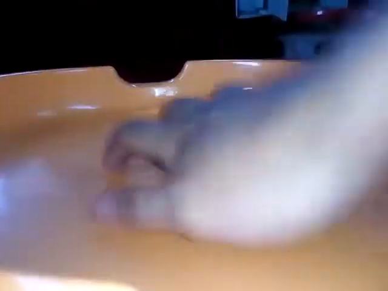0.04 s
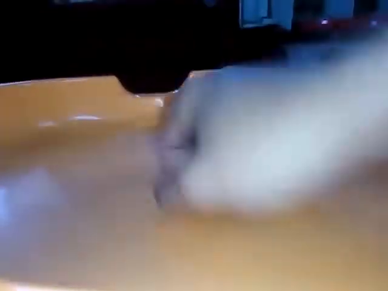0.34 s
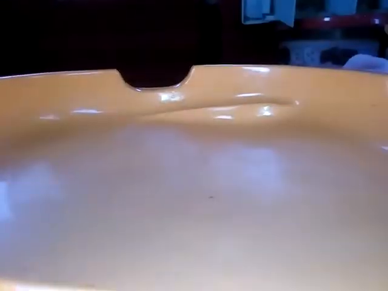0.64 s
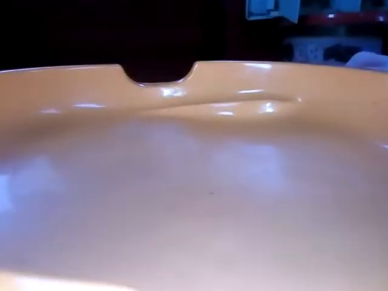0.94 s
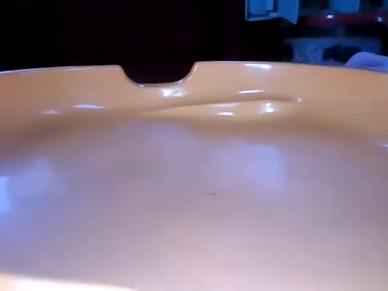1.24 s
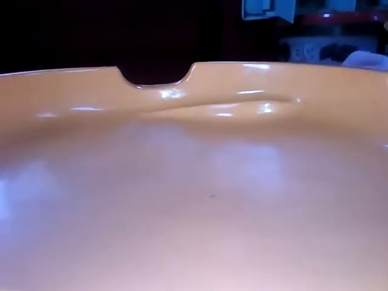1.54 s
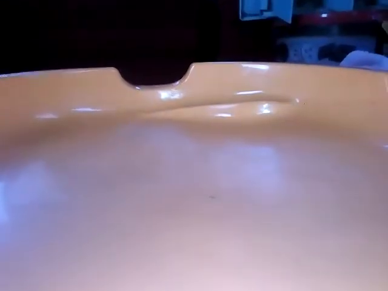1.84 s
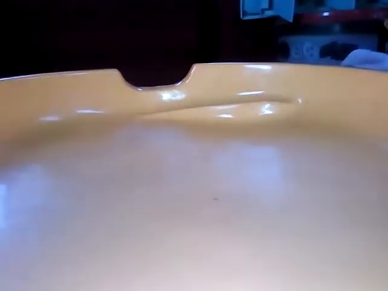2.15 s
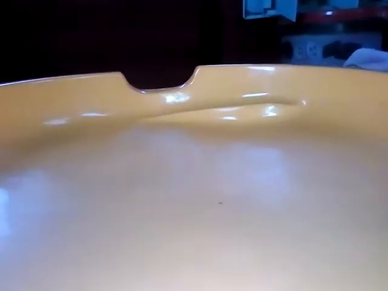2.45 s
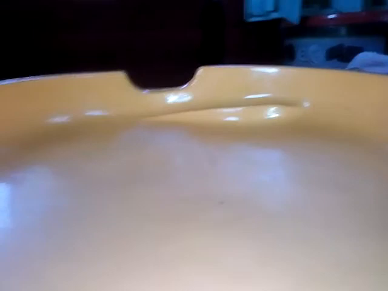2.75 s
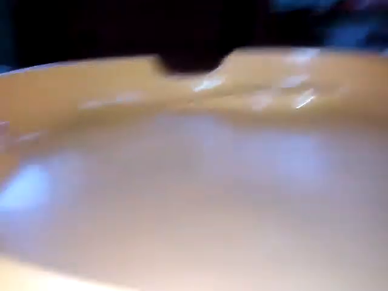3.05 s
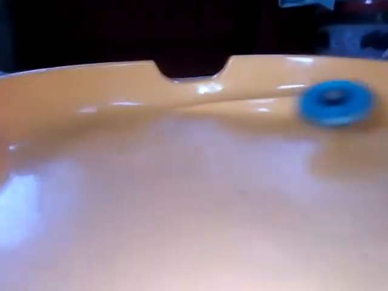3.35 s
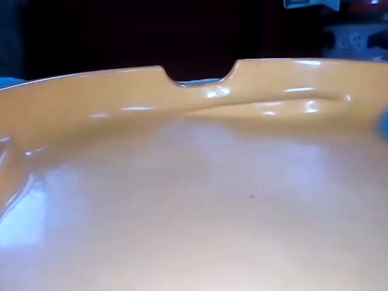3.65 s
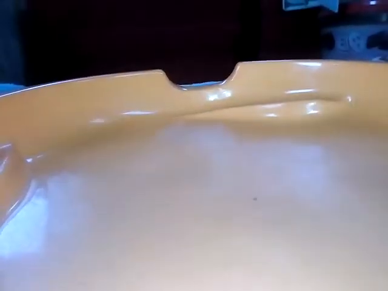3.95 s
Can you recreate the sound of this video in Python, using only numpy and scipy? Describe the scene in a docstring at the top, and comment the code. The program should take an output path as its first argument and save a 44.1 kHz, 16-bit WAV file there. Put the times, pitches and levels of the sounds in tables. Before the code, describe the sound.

Toy spinning top launched with plastic clicks and a quick zip, landing in a bowl, droning.

```python
"""You hear plastic brushing and clicking, a quick zip, a double clack, then a low, steady drone.
A hand sweeps a toy top out of a plastic bowl and clicks it onto its launcher. The zip is the toothed
cord turning the launcher's gear. The top drops into the bowl and spins, shaking it once per turn.
The hand-held camera thuds and rumbles throughout, over the hum and hiss of a small room."""
import sys
import numpy as np
from scipy import signal
from scipy.fft import rfft, irfft
from scipy.io import wavfile

SR = 44100
rng = np.random.default_rng(int(sys.argv[2]) if len(sys.argv) > 2 else 0)


def wrap_up_sound(samples):
    """Save the sound to the file named by the first command line argument, as 16-bit audio."""
    columns = np.atleast_2d(samples).T
    # keep every value between -1 and 1, then stretch to whole-number steps
    tamed = np.clip(columns, -1, 1)
    steps = np.round(tamed * 32767).astype(np.int16)
    wavfile.write(sys.argv[1], SR, steps)


N = 176400
T = np.arange(N) / SR
RING_T = T[:SR // 5]  # time within one short sound [s]

# the tone of a plastic click (frequency [Hz], level [dB])
PLASTIC_TONE = [(300, -35), (900, -11), (1500, 3.5), (2200, 5.5), (3800, 9), (5000, -2.5), (6700, 3),
                (8300, -16), (10600, -20), (13000, -31.5), (14900, -29), (16000, -48)]
# the pull on the cord (time [s], level [dB], speed [teeth per s])
CORD_PULL = [(3.03,-39,227), (3.049,-36.5,282), (3.068,-27,350), (3.091,-21,370), (3.108,-25,455),
             (3.125,-18,480), (3.15,-21,600), (3.156,-34.5,510), (3.167,-45,730), (3.176,-51,500)]


def amp(db):
    """Turns decibels into a number to multiply a sound by."""
    return 10 ** (np.asarray(db) / 20)


def unit(x):
    """Scales a signal to an average size (rms) of 1."""
    return x / np.sqrt(np.mean(x ** 2) + 1e-20)


def value_at(points, hz):
    """Reads between the rows of a (frequency, value) table, spacing octaves evenly."""
    row_hz, value = np.transpose(points)
    return np.interp(np.log(hz + 1), np.log(row_hz + 1), value)


def add(mix, s, sound):
    """Mixes a sound in, starting at s seconds."""
    part = mix[round(s * SR):][:len(sound)]
    part += sound[:len(part)]


def keep_band(x, side, hz, order):
    """Keeps the "low" or "high" side of hz; a higher order cuts more steeply."""
    return signal.sosfilt(signal.butter(order, hz, side, fs=SR, output="sos"), x)


def colour(x, tone, tilt_db=0, size=8192):
    """Gives a sound the tone in a table, adding tilt_db for each octave above 1000 Hz."""
    hz = abs(np.fft.fftfreq(size, 1 / SR))
    octaves = np.log2(np.maximum(hz, 1000) / 1000)
    log_gain = np.log(amp(value_at(tone, hz) + tilt_db * octaves))
    spectrum = np.exp(np.conj(signal.hilbert(log_gain)))  # rings after a hit, never before
    response = np.fft.ifft(spectrum).real[:size // 2]
    return signal.fftconvolve(x, response / np.linalg.norm(response))[:len(x)]


def noise(tone, low_hz=0):
    """Steady noise with the given tone, cut below low_hz if that is set."""
    x = colour(rng.standard_normal(N), tone)
    return unit(keep_band(x, "high", low_hz, order=3) if low_hz else x)


def drift(hz):
    """A random wobble, up to about hz times a second."""
    smoothing = np.exp(-(np.fft.rfftfreq(N, 1 / SR) / hz) ** 2)
    return unit(irfft(rfft(rng.standard_normal(N)) * smoothing, N))


def fade(t60):
    """Dies away by 60 dB in t60 seconds, the fade time."""
    return np.exp(-np.log(1000) * RING_T / t60)


def burst(t60, rise_s):
    """A puff of noise, like many pitches ringing at once and dying quickly."""
    return rng.standard_normal(len(RING_T)) * fade(t60) * (1 - np.exp(-RING_T / rise_s))


def level(rows):
    """Loudness that follows (time, level) rows and is silent outside them."""
    s, db = np.transpose(rows)[:2]
    return amp(np.interp(T, s, db)) * (T >= s[0]) * (T <= s[-1])


def push(hz):
    """One smooth push; a higher hz makes it shorter and taller."""
    from_peak_s = RING_T[:SR // 50] - 0.01
    return -hz / SR * 10 * np.exp(-(np.pi * hz * from_peak_s) ** 2)


def ringing(pitches):
    """A struck object rings at several fading pitches; neighbours start in opposite directions."""
    return sum((-1) ** k * amp(db) * np.sin(2 * np.pi * hz * RING_T) * fade(t60)
               for k, (hz, db, t60) in enumerate(pitches))


def snap():
    """The tiny burst that starts a plastic click."""
    return burst(t60=0.013, rise_s=0.00043)


def uneven(spread_db):
    """Random strengths for small hits: most are weak, a few stronger."""
    return amp(spread_db * np.minimum(rng.exponential(1, N), 3))


def ticks(active, per_s, db, tilt_db):
    """Tiny plastic touches at random moments, wherever active is true."""
    hits = (rng.random(N) < per_s / SR) * active * amp(db) * uneven(spread_db=2)
    return signal.fftconvolve(hits, colour(snap(), PLASTIC_TONE, tilt_db))[:N]


def background():
    """The room hums and the microphone hisses, both wavering a little."""
    # the tone of the hiss (frequency [Hz], level [dB])
    hiss_tone = [(20, 2), (60, 5.5), (130, 2), (250, -7), (500, -18), (900, -21.5), (1700, -22.5),
                 (2800, -28.5), (4500, -39), (6600, -41), (8200, -56.5), (13500, -57.5), (15000, -48.5),
                 (16000, -42)]
    hiss_db, hum_db, hum_hz = -36, -39.5, 139
    cycles = np.cumsum(hum_hz * (1 + 0.013 * drift(14))) / SR
    hum = np.sqrt(2) * np.sin(2 * np.pi * cycles)
    hiss = amp(hiss_db + 0.5 * drift(1.7)) * noise(hiss_tone)
    return hiss + amp(hum_db + 0.5 * drift(2.7)) * hum


def room_echo(x):
    """Sound bounces quickly off the bowl, then dies away in the small room."""
    # how long the room rings (frequency [Hz], fade time [s])
    fade_times = [(100, 0.28), (1000, 0.85), (3000, 0.32), (6500, 0.26), (14000, 0.22)]
    room_db, bowl_db, build_up_s = -26, -15, 0.013
    hz, t, bands = signal.stft(rng.standard_normal(SR // 2), SR, nperseg=256)
    fading = np.exp(-np.log(1000) * t / value_at(fade_times, hz)[:, None])
    tail = signal.istft(bands * fading, SR, nperseg=256)[1]
    tail *= np.clip(T[:len(tail)] / build_up_s, 0, 1)
    bounces = burst(t60=0.14, rise_s=0.003) * (rng.random(len(RING_T)) < 2000 / SR)
    echoes = amp(room_db) * tail / np.linalg.norm(tail)
    add(echoes, 0, amp(bowl_db) * bounces / np.linalg.norm(bounces))
    return signal.fftconvolve(x, echoes)[:N]


def camera_handling():
    """The hand knocks the camera's case, and many small slips rumble when the grip shifts."""
    # knocks on the case (time [s], relative thud level [dB], relative tap level [dB])
    knocks = [(0.012, -8, -26.5), (0.215, -18, -26.5), (0.324, -13, -32), (0.459, -6, -39.5),
              (0.513, -10.5, -29), (0.555, -8, -36), (0.628, -6, -36), (0.683, -5, -34),
              (0.739, -7.5, -31.5), (1.049, -28, -25.5), (1.061, -28, -30.5), (1.103, -8, -59),
              (1.28, -12, -40.5), (1.361, -11, -41), (1.5, -16, -46), (1.574, -7.5, -38),
              (1.631, -25, -25.5), (1.662, -15, -33.5), (1.847, -7, -40), (1.907, -32, -26.5),
              (2.082, -11, -27.5), (2.143, -20, -33), (2.287, -8, -31), (2.337, -7, -35),
              (2.35, -3.5, -26.5), (2.418, -8, -48), (2.511, -8.5, -33), (2.614, -23, -25),
              (2.645, -8, -41), (2.687, -3, -31), (2.709, -11, -37), (2.775, -19, -28.5),
              (2.807, -7.5, -30), (2.966, -17, -25.5), (3.062, -31, -30.5), (3.075, -21, -31),
              (3.297, -5.5, -30), (3.342, -18, -29.5), (3.419, -8, -26), (3.456, -20, -26), (3.484, 2, -34),
              (3.696, -16, -36.5), (3.796, -14, -28.5), (3.817, -2, -34), (3.85, -15, -24.5),
              (3.871, 1, -38)]
    # shifts of the grip (start [s], length [s], relative level [dB])
    grip_shifts = [(.01,0.1,-26), (0.189,0.083,-24.5), (0.278,0.14,-28.5), (0.426,0.17,-33),
                   (0.625,0.19,-29), (1.009,0.15,-25.5), (1.496,0.034,-23), (1.562,0.16,-28.5),
                   (1.807,0.055,-25), (1.889,0.28,-29.5), (2.247,0.2,-24.5), (2.502,0.053,-23.5),
                   (2.56,0.17,-26.5), (2.765,0.072,-25.5), (2.947,0.15,-22.5), (3.28,0.16,-26),
                   (3.407,0.11,-19.5), (3.641,0.066,-26.5), (3.781,0.11,-27), (3.968,.06,-25)]
    # the tones of the case and of the slipping grip (frequency [Hz], level [dB])
    case_tone = [(25, -40), (60, -17), (110, -0.5), (170, 1), (260, 2), (450, 1.5), (800, -8),
                 (1500, -24.5), (3000, -73)]
    rumble_tone = [(20, -20), (50, -4), (100, 4), (180, -0.5), (300, -5.5), (500, -17), (800, -27.5),
                   (1500, -44.5), (4000, -97.5)]
    hard_tap_db, resting_db, shift_edge_s, slips_per_s = -26, -38, 0.0072, 300
    pushes, shifting = np.zeros(N), np.full(N, amp(resting_db))
    for s, thud_db, tap_db in knocks:
        tap_hz = 886 * 2 ** max(tap_db - hard_tap_db, 0)  # harder taps are shorter and brighter
        knock = amp(thud_db + 7) * push(hz=186) + amp(tap_db + 17.5) * push(tap_hz)
        add(pushes, max(s - 0.009, 0), knock)  # starts early so it peaks near s
    for s, length, db in grip_shifts:
        inside_s = np.minimum(T - s, s + length - T)
        shifting += amp(db) * np.clip(inside_s / shift_edge_s + 0.5, 0, 1)
    slips = np.sign(rng.standard_normal(N)) * (rng.random(N) < slips_per_s / SR)
    slips = unit(slips * uneven(spread_db=2))
    return colour(pushes, case_tone) + amp(-1) * colour(shifting * slips, rumble_tone)


def hand_sweep():
    """Skin brushes across the plastic bowl."""
    # the swell of the stroke (time [s], level [dB])
    stroke = [(.087,-49), (.125,-42.5), (.155,-42.5), (.185,-36), (.215,-34.5), (.26,-44), (.29,-59)]
    # the tone of skin on plastic (frequency [Hz], level [dB])
    brush_tone = [(410, -36), (700, 1.5), (1460, -5.5), (1750, -8.5), (2370, -2.5), (2770, -10), (4210, -7),
                  (6230, -12), (10300, -42), (15200, -41), (16000, -40)]
    return level(stroke) * amp(1.1 * drift(200)) * noise(brush_tone, low_hz=620)


def rattle():
    """Loose parts chatter softly as the top goes onto the launcher."""
    # spells of rattling (start [s], length [s])
    spells = [(1.012, .11), (1.22, .02), (1.868, .1), (2.119, .045)]
    active = sum((T > s) * (T < s + length) for s, length in spells)
    return ticks(active, per_s=220, db=-45.5, tilt_db=-0.5)


def clicks():
    """Plastic parts snap together; each click rings at its own pitch and has one quick echo."""
    # clicks of top and launcher
    # (time [s], relative level [dB], ring pitch [Hz], ring share [dB], brightness [dB per octave])
    hits = [(.197,-14.5,2440,-2,-3.5), (0.9759,-30.5,2930,0,1.5), (1.0167,-32,5750,-8,11),
            (1.069,-30,6760,-13,15), (1.082,-21.5,4330,-10,2), (1.107,-27,5120,2,5),
            (1.119,-18.5,6500,-8,15.5), (1.1242,-19.5,6860,-8,2), (1.141,-27.5,6250,0,-1),
            (1.681,-31,3930,-2,2), (1.6866,-23,4200,-6,7), (1.693,-24,4000,3,-1), (1.891,-26.5,4000,-3,-3),
            (1.92,-26,3880,-1,-9), (1.9303,-20,3830,-6,-1.5), (1.945,-13,3640,-9,-3.5),
            (2.1595,-18.5,2750,-2,-5), (2.2794,-26.5,4070,-10,-3), (2.2951,-20.5,2790,-6.5,1),
            (2.3008,-11,3590,-7,2), (2.305,-19.5,1450,0.5,-5), (2.4147,-29,2120,-8,-11.5),
            (2.6502,-21,3060,-10,-2), (3.0128,-17,3040,-11,-1.5), (3.028,-24,3360,-1,4),
            (3.061,-18.5,6200,-1.5,7), (3.077,-14,3490,-4,7), (3.092,-18,6560,0,8),
            (3.1015,-10.5,6650,0.5,-6), (3.1193,-4.5,1640,-1.5,6.5), (3.1216,-12,3660,-9,6.5),
            (3.14,-4.5,3750,-3,1), (3.146,-7.5,3980,-2,7), (3.15,-14.5,4140,11.5,-6),
            (3.1792,-22.5,3840,-1,2), (3.197,-33,6500,-10,9), (3.3647,-13.5,2360,-3,-7.5)]
    echo_s, echo_db, min_width_hz = 0.0031, -10, 390
    out = np.zeros(N)
    for s, db, hz, ring_db, tilt_db in hits:
        b, a = signal.iirpeak(hz, hz / max(min_width_hz, hz / 6), fs=SR)  # lets one pitch through
        for delay_s, path_db in (0, 0), (echo_s, echo_db):
            hit = snap()
            ring = unit(signal.lfilter(b, a, signal.lfilter(b, a, hit))) * hit.std()
            click = colour(hit, PLASTIC_TONE, tilt_db) + amp(ring_db) * ring
            add(out, s + delay_s, amp(db - 6 + path_db) * click)
    return out


def latching():
    """The top's catch snaps in and the launcher's shell is knocked; both ring with clear pitches."""
    # hits on the catch and on the shell (time [s], level [dB])
    catch_snaps = [(1.1188, -30), (1.1236, -26)]
    shell_knocks = [(1.6864, -26.5)]
    # how each one rings (pitch [Hz], relative level [dB], fade time [s])
    catch_pitches = [(3330, -9, 0.043), (6100, -1.5, 0.057), (6770, -0.5, .04), (8160, -6, .02)]
    shell_pitches = [(1494, -1, 0.034), (4050, -6, .035), (4320, -1.5, 0.028), (5640, -4.5, 0.028),
                     (6690, -11, 0.029)]
    out = np.zeros(N)
    for hits, pitches in (catch_snaps, catch_pitches), (shell_knocks, shell_pitches):
        for s, db in hits:
            add(out, s, amp(db) * ringing(pitches))
    return out


def heavy_jolts():
    """Jolts of the camera and bowl give a heavy thud with a short, dull clatter."""
    # jolts of the camera and bowl (time [s], thud level [dB], thud pitch [Hz], thud fade time [s],
    # clatter level [dB], clatter fade time [s])
    jolts = [(0.0831,-9.5,170,0.07,-31,0.039), (3.1794,-1,182,0.043,-11.5,0.087),
             (3.3669,-8,147.7,0.12,-15.5,0.028)]
    # the tone of the clatter (frequency [Hz], level [dB])
    clatter_tone = [(100, -6), (300, 8.5), (750, -1), (1200, -0.5), (2500, -11.5), (4000, -23), (7000, -50),
                    (15000, -63)]
    out = np.zeros(N)
    for s, thud_db, hz, thud_t60, clatter_db, clatter_t60 in jolts:
        thud = amp(thud_db) * np.sin(2 * np.pi * hz * RING_T) * fade(thud_t60)
        clatter = amp(clatter_db) * colour(burst(clatter_t60, rise_s=0.0015), clatter_tone)
        add(out, s, thud + clatter)
    return out


def rip_cord():
    """The toothed cord speeds up the launcher's gear; each tooth makes a puff of noise."""
    # the tone of teeth on the gear (frequency [Hz], level [dB])
    gear_tone = [(530, -47), (900, -8), (1290, -2), (1770, -3), (2450, -10.5), (2960, -4), (3770, -7),
                 (4460, -14), (5200, -10.5), (5700, -6), (6720, -13), (8150, -22), (10800, -29),
                 (12600, -43), (15000, -28), (16000, -40)]
    spread_db, tooth_fade = 4, 0.47  # the fade is a share of the time between teeth
    s, _, teeth_per_s = np.transpose(CORD_PULL)
    teeth_passed = np.cumsum(np.interp(T, s, teeth_per_s) * amp(1.2 * drift(150))) / SR
    strength = amp(spread_db * rng.standard_normal(N))[teeth_passed.astype(int)]
    pulses = strength * np.exp(-(teeth_passed % 1) / tooth_fade)
    rasp = colour(unit(pulses * rng.standard_normal(N)), gear_tone)
    return level(CORD_PULL) * keep_band(rasp, "high", hz=1120, order=5)


def top_landing():
    """The top's tip and rim strike the bowl and bounce once; each hit cracks and rings."""
    # hits on the bowl (time [s], level [dB])
    hits = [(3.5248, -14), (3.52655, -12), (3.5354, -24.5), (3.53715, -12.5)]
    # how the bowl rings (pitch [Hz], relative level [dB], fade time [s])
    bowl_pitches = [(555, -7, 0.022), (657, -3.5, 0.03), (980, -13, 0.04), (1526, -16, 0.079),
                    (1746, -11.5, 0.058), (2085, -3, 0.018), (2300, 4, 0.013), (3400, -20, 0.022),
                    (4000, -13, 0.014), (5480, -14, 0.015)]
    # the tone of the crack (frequency [Hz], level [dB])
    crack_tone = [(400,-6), (1000,-2), (2300,4), (3800,-6.5), (6200,-14.5), (8000,-30.5), (12000,-38),
                  (16000,-35.5)]
    ring = keep_band(ringing(bowl_pitches), "low", hz=6500, order=3)  # a slightly soft contact
    out = np.zeros(N)
    for s, db in hits:
        crack = amp(-0.5) * colour(burst(t60=0.019, rise_s=0.00013), crack_tone)
        add(out, s, amp(db) * (ring + crack))
    return out


def top_spinning():
    """The unbalanced top shakes the bowl once per turn; its tip scrapes and catches on scratches."""
    # the pitches of the drone (multiple of the spin speed [x], level [dB])
    drone_pitches = [(1, -31), (2, -31.5), (3, -43.5), (4, -47.5), (7, -53)]
    # the tone of the scraping tip (frequency [Hz], level [dB])
    tip_tone = [(600, -8), (845, -22), (1110, -13), (1530, -20.5), (1890, -23), (4160, -29.5),
                (4630, -32.5), (6690, -41.5), (7940, -54), (14000, -61)]
    start_s, rise_s, spin_hz, slowing_hz_per_s = 3.54, 0.21, 95.6, 3
    scrape_db, scrape_fade_db_per_s = -44, 14
    age_s, spinning = T - start_s, T > start_s
    turns_per_s = (spin_hz - slowing_hz_per_s * age_s) * (1 + 0.0074 * drift(10.6))
    angle = 2 * np.pi * np.cumsum(turns_per_s) / SR
    drone = sum(amp(db) * np.sqrt(2) * np.cos(k * angle + 2 * np.pi * rng.random())
                for k, db in drone_pitches)
    scrape_level = amp(scrape_db - scrape_fade_db_per_s * np.maximum(age_s, 0) + 1.5 * drift(15))
    scrape = scrape_level * noise(tip_tone, low_hz=607) * (1 + 0.17 * np.cos(angle))
    scratches = ticks(spinning, per_s=50, db=-49.5, tilt_db=-3)
    return drone * np.clip(age_s / rise_s, 0, 1) + scrape * spinning + scratches


def scene():
    """The toy and its echo, over the camera's noises and the background."""
    toy = hand_sweep() + clicks() + latching() + rattle() + rip_cord() + heavy_jolts()
    clack = top_landing()
    echo_share = np.where(T > CORD_PULL[0][0], amp(-2), 1)  # less echo once the pull starts
    echo = room_echo(toy * echo_share + amp(-2.5) * clack)
    return (toy + clack + echo + top_spinning() + camera_handling() + background())[None]


def record(dry):
    """The microphone loses the deepest bass and the highest treble."""
    dry = keep_band(dry, "high", hz=43.3, order=2)
    treble_cut = signal.firwin(161, cutoff=15600, window=("kaiser", 9), fs=SR)
    return signal.oaconvolve(dry, treble_cut[None], "same")


dry = scene()
out = record(dry)
wrap_up_sound(out)
```